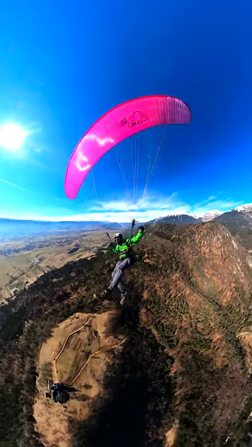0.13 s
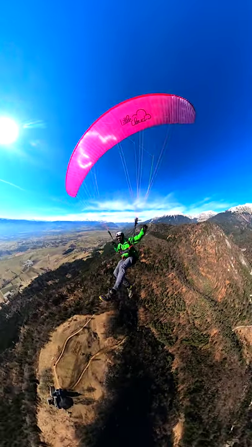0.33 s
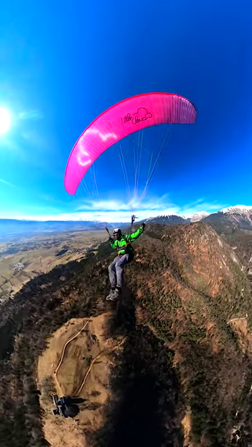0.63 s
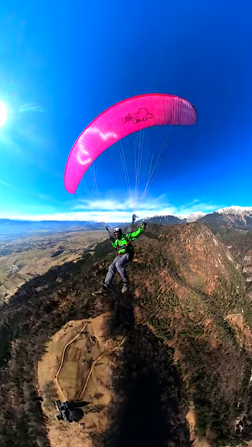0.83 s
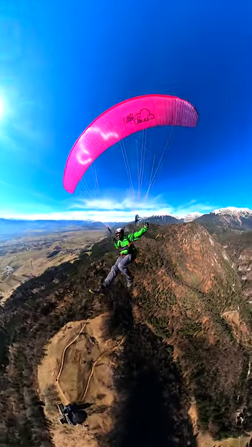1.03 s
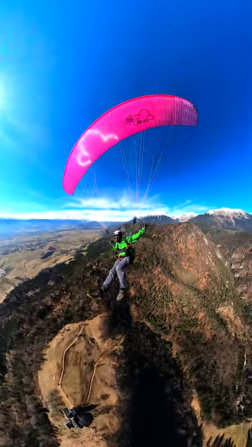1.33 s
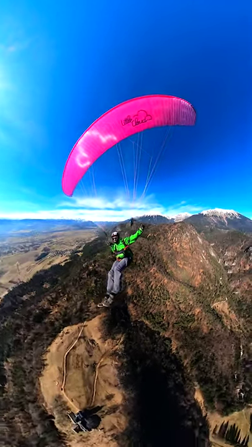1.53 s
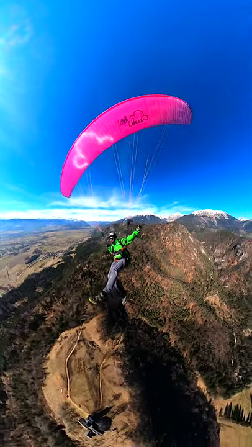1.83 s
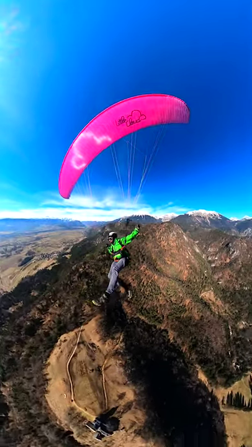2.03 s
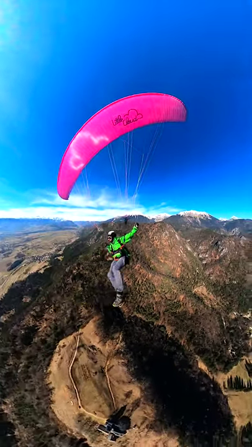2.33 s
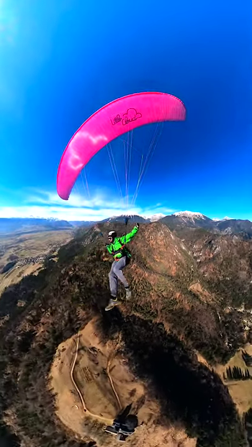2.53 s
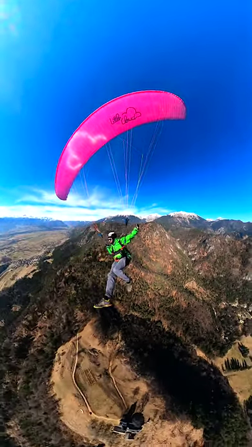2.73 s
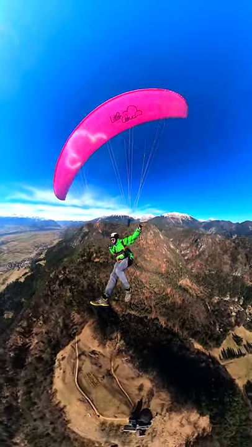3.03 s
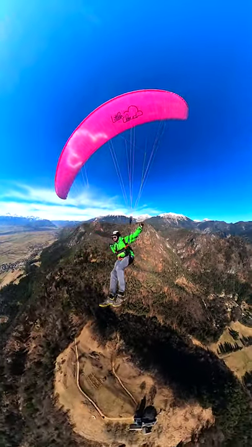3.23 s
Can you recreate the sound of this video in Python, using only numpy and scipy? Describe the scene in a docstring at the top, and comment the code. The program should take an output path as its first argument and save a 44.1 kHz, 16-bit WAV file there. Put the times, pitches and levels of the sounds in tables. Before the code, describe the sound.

Wind roars over a bare microphone on a paragliding flight for about 3.4 seconds, already under way at the start and never stopping. Deep, uneven rumble dominates, surging near 0.5, 0.9 and 3.2 s. Irregular dull thumps strike throughout, with a sharper-edged buffet near 0.8 s and crowded ones around 2-2.6 s. A faint airy hiss, slightly hollow near 1 kHz, rises a little late. Close, dry, no echo.

```python
"""Wind turbulence on a bare microphone carried through the air high above the ground: a lumpy rumble.
Filtered noise in bands makes the rumble; filtered pulses make short, brighter buffets from strong eddies.
Air streaming past housing, lines and clothing adds a smooth hiss of coloured noise,
with a resonator giving it a soft hollow band near 1 kHz."""
import sys
import numpy as np
from scipy import signal
from scipy.fft import rfft, irfft, next_fast_len
from scipy.io import wavfile
from scipy.ndimage import uniform_filter1d, minimum_filter1d

SR = 44100
rng = np.random.default_rng(int(sys.argv[2]) if len(sys.argv) > 2 else 0)


def dump_mix(stems):
    """Bounce the given channels to the path in sys.argv[1] as a 16-bit WAV at rate SR."""
    frames = np.atleast_2d(stems).T  # one column per channel
    limited = np.clip(frames, -1, 1)  # hard clip at full scale
    pcm = np.round(limited * 32767).astype(np.int16)
    wavfile.write(sys.argv[1], SR, pcm)


N = 149499


def from_db(db):
    """Decibels to an amplitude factor."""
    return 10 ** (np.asarray(db) / 20)


def rms_one(x):
    """Scale a sound to an rms of 1."""
    return x / np.sqrt(np.mean(x ** 2) + 1e-20)


def in_time(rows):
    """Draw each column of a time table as a curve over the whole sound."""
    s, *columns = np.transpose(rows)
    return [np.interp(np.arange(N) / SR, s, c) for c in columns]


def drift(rate_hz):
    """Random wander with an rms of 1: noise through two equal low-pass poles at rate_hz."""
    step = 40   # samples between the points of the wander
    r = np.exp(-2 * np.pi * rate_hz * step / SR)
    noise = rng.standard_normal(N // step + 2002)
    slow = signal.lfilter([1], [1, -2 * r, r * r], noise)[2000:]   # drop the filter's start-up
    return np.interp(np.arange(N) / step, np.arange(len(slow)), rms_one(slow))


def bands(spectrum):
    """Yield (centre Hz, sound): overlapping bands, half an octave apart, of coloured noise with rms 1."""
    size = next_fast_len(N)
    hz = np.maximum(np.arange(size // 2 + 1) * SR / size, 1)
    table_hz, table_db = np.transpose(spectrum)
    colour_db = np.interp(np.log(hz), np.log(table_hz), table_db)
    colour = rfft(rng.standard_normal(size)) * from_db(colour_db)
    colour /= np.std(irfft(colour, size))
    for centre in 2 ** np.arange(2, 14.5, .5):
        if table_hz[0] / 2 < centre < table_hz[-1] * 2:
            octaves_away = np.clip(np.log2(hz / centre), -.5, .5)
            window = np.cos(np.pi * octaves_away) ** 2   # neighbouring windows sum to 1
            yield centre, irfft(colour * window, size)[:N]


def blend(hz, low_hz, high_hz):
    """0 below, 1 above, on a log axis."""
    return np.clip(np.log(hz / low_hz) / np.log(high_hz / low_hz), 0, 1)


def rumble():
    """Pressure swirls on the port: deep bands are evened and follow their level curve in part, upper get lumps."""
    # level curves of the deep and upper rumble; the deep mean sets the base level,
    # otherwise only swings about each mean count: t/s, deep level/dB, upper level/dB
    rumble_level = [(0.02, -24, -27.5), (0.36, -24, -23), (0.52, -9.5, -27.5), (0.56, -28, -31),
                    (0.9, -4.5, -26.5), (0.94, -24.5, -30.5), (0.98, -29.5, -25.5), (1.08, -6, -28),
                    (1.1, -26, -36), (1.17, -28, -32.5), (1.2, -11, -20.5), (1.25, -27, -32.5),
                    (1.5, -16, -25.5), (1.7, -26.5, -29.5), (1.74, -10.5, -21.5), (1.89, -23.5, -31.5),
                    (2.03, -18, -29.5), (2.09, -13.5, -24.5), (2.14, -19, -29.5), (2.32, -14.5, -21.5),
                    (2.45, -23.5, -29), (2.63, -13.5, -27.5), (2.69, -39.5, -29), (2.74, -19, -27.5),
                    (3.07, -21, -29), (3.1, -18, -17.5), (3.15, -24, -27), (3.19, -8, -30.5),
                    (3.31, -23, -27), (3.37, -22, -24)]
    # swing of the rough top of the rumble: t/s, level/dB
    rough = [(0.0, -38), (0.76, -39.5), (0.88, -35.5), (1.26, -42), (2.04, -38.5), (2.15, -36), (2.47, -36),
             (2.64, -41), (2.84, -39), (3.39, -37)]
    # colour of the rumble: f/Hz, relative level per Hz/dB
    rumble_colour = [(7.1, -32.5), (12, -7.5), (33, 4.5), (88, 0), (173, -10), (250, -18.5), (350, -26.5),
                     (493, -40), (600, -47), (780, -66.5), (1320, -120)]
    split_hz = 52   # centre of the crossover from deep to upper
    lump_db, lumps_hz = 2.5, 25   # small eddies swell the upper rumble together
    own_db, own_hz = 0.4, 5.7   # and band by band
    even_share, even_s = 0.087, 0.049   # the deep rumble holds steadier than plain noise
    rough_follows = .7   # share of the rough table's swing

    deep_db, upper_db = in_time(rumble_level)
    rough_db, = in_time(rough)
    mean_db = deep_db.mean()
    deep_swing = deep_db - mean_db
    upper_swing = upper_db - upper_db.mean()
    rough_swing = rough_follows * (rough_db - rough_db.mean())
    lumps = lump_db * drift(lumps_hz)
    out = 0
    for hz, band in bands(rumble_colour):
        up = blend(hz, split_hz / 2, split_hz * 2)
        power = uniform_filter1d(band ** 2, int(SR * (even_s + 2 / hz))) / np.mean(band ** 2)
        evened = band * (power + .1) ** (-even_share * (1 - up) / 2)
        # share of the deep curve that a band follows, least in the very lowest
        deep = deep_swing * (0.4 + 0.11 * blend(hz, 20.2, 80.8))
        top = blend(hz, 130, 190)
        upper = (1 - top) * upper_swing + top * rough_swing
        upper = upper + lumps + own_db * drift(own_hz)
        out = out + evened * from_db(mean_db + (1 - up) * deep + up * upper)
    return out


def buffets():
    """Each eddy is a sudden push of pressure: a dull thump with a brighter edge; strong ones swing back."""
    # strong eddies, each pulse on its own: t/s, thump peak level/dB, bright edge peak level/dB
    strong_eddies = [(0.049, -14.5, -36), (0.099, -23, -29), (0.162, -11.5, -29.5), (0.209, -25, -37),
                     (0.359, -18.5, -42), (0.708, -16, -29), (0.798, -9.5, -17), (0.887, -14, -42),
                     (1.069, -16, -39), (1.177, -13.5, -35), (1.366, -12.5, -35.5), (1.485, -23, -37),
                     (1.513, -12, -33), (1.724, -15, -33), (1.818, -13, -31), (1.987, -19, -36),
                     (2.043, -14, -35.5), (2.076, -8, -36), (2.189, -16.5, -39), (2.256, -9.5, -30.5),
                     (2.306, -13, -33), (2.39, -19, -36), (2.499, -10.5, -31), (2.534, -15, -35),
                     (2.592, -10.5, -29.5), (2.624, -10, -42), (2.911, -10, -32), (2.993, -11.5, -36),
                     (3.089, -11, -26), (3.198, -12, -28), (3.283, -17, -37), (3.347, -11.5, -36)]
    thump_low_hz, thump_high_hz, edge_high_hz = 30, 204.6, 370   # the edge starts where the thump ends
    echo_s, echo_db, echo_edge_db = .011, -3.5, -12.5   # mean delay and levels of the reversed swing
    # lesser eddies land at random; their edge level is relative to their thump
    small_per_s, small_db, small_spread_db, small_edge_db = 30, -24, 1, -19.5

    pushes = np.zeros((2, N + SR)) + 1e-18   # rows: thump, edge
    lands = rng.random(N) < small_per_s / SR
    small_level = from_db(small_db + small_spread_db * rng.standard_normal(N))
    small = lands * rng.choice([-1, 1], N) * small_level
    pushes[:, :N] += small * from_db([[0], [small_edge_db]])

    chances = rng.random((len(strong_eddies), 2))
    for (s, db, edge_db), (side, wait) in zip(strong_eddies, chances):
        push = np.sign(side - .5) * from_db([db, edge_db])   # inward or outward by chance
        i = int(s * SR)
        pushes[:, i] += push
        back = i + int(echo_s * (.5 + wait) * SR)
        pushes[:, back] -= push * from_db([echo_db, echo_edge_db])

    out = 0
    lows_hz, highs_hz = (thump_low_hz, thump_high_hz), (thump_high_hz, edge_high_hz)
    for row, low_hz, high_hz in zip(pushes, lows_hz, highs_hz):
        high_pass = signal.butter(1, low_hz, "high", fs=SR, output="sos")
        low_pass = signal.butter(4, high_hz, fs=SR, output="sos")
        shape = np.vstack([high_pass, low_pass])
        single_peak = signal.sosfilt(shape, np.eye(1, SR // 10)[0]).max()
        out = out + signal.sosfilt(shape, row) / single_peak
    return out[:N]


def hiss():
    """Smooth flow noise whose treble swings on its own curve, plus noise through a cavity resonance."""
    # airflow hiss: t/s, level/dB
    flow = [(0.0, -50.5), (0.15, -52.5), (0.18, -50.5), (0.35, -53), (0.44, -50.5), (0.48, -52),
            (0.79, -53), (0.8, -48.5), (0.82, -52.5), (1.29, -51.5), (1.43, -49.5), (2.12, -49.5),
            (2.13, -50.5), (2.26, -49.5), (2.48, -50.5), (3.16, -49), (3.17, -47), (3.39, -49.5)]
    # treble hiss, of which only the swing against the airflow level counts: t/s, level/dB
    treble = [(0.04, -62.5), (0.06, -62), (0.13, -66), (0.41, -65), (0.43, -64), (0.69, -68), (0.81, -62),
              (0.84, -65.5), (1.35, -66), (1.44, -61.5), (1.6, -64), (1.71, -62.5), (2.2, -70.5),
              (2.27, -66), (2.71, -67.5), (3.18, -63.5), (3.2, -61), (3.34, -62)]
    # colour of the hiss: f/Hz, relative level per Hz/dB
    hiss_colour = [(320, -37), (550, -2), (923, -5), (1060, -3.5), (1290, -5), (2430, -12.5), (4680, -25),
                   (5190, -24.5), (6840, -30.5), (7500, -33), (8610, -44.5), (11200, -77.5), (18900, -120)]
    hollow_hz, hollow_width_hz, hollow_db = 1056, 72, -9   # level relative to the smooth hiss

    level_db, = in_time(flow)
    treble_db = in_time(treble)[0] - level_db
    treble_swing = treble_db - treble_db.mean()
    flutter = .5 * drift(24)   # dB, all bands together
    out = 0
    for hz, band in bands(hiss_colour):
        swing = blend(hz, 1400, 4000) * treble_swing
        patches = .5 * drift(14.0)   # dB, each band on its own
        out = out + band * from_db(swing + flutter + patches)

    r = np.exp(-np.pi * hollow_width_hz / SR)
    poles = [1, -2 * r * np.cos(2 * np.pi * hollow_hz / SR), r * r]
    hollow = rms_one(signal.lfilter([1, 0, -1], poles, rng.standard_normal(N)))
    hollow_level = from_db(hollow_db + 0.53 * drift(6.4))
    return from_db(level_db) * (out + hollow_level * hollow)


def scene():
    """Sum rumble, buffets and hiss at the one microphone."""
    return (rumble() + buffets() + hiss())[None]


def record(dry):
    """A gentle limiter holds the tallest swings, the top is cut, faint self-noise remains."""
    limit_db, limit_s, limit_share = -9.5, .012, .5   # threshold, smoothing, share of the excess dB removed
    stop_hz, self_noise_db = 10120, -101   # the top cut is 40 dB deep from stop_hz up

    span = int(limit_s * SR)
    gain = np.minimum(from_db(limit_db) / (np.abs(dry) + 1e-9), 1) ** limit_share
    lowest = minimum_filter1d(gain, span)
    smooth = uniform_filter1d(uniform_filter1d(lowest, span // 2), span // 2)
    held = dry * smooth
    top = signal.cheby2(8, 40, stop_hz, fs=SR, output="sos")
    cut = signal.sosfilt(top, held - held[:, :1]) + held[:, :1]   # starts already settled
    return cut + from_db(self_noise_db) * rng.standard_normal(dry.shape)


dry = scene()
out = record(dry)
dump_mix(out)
```